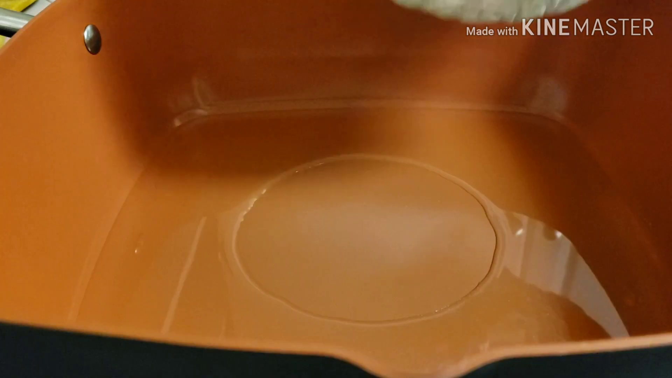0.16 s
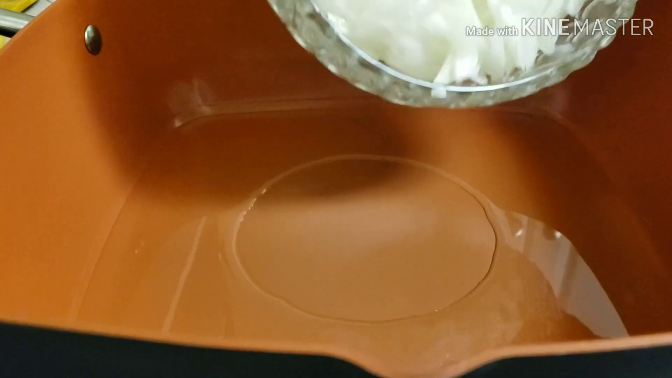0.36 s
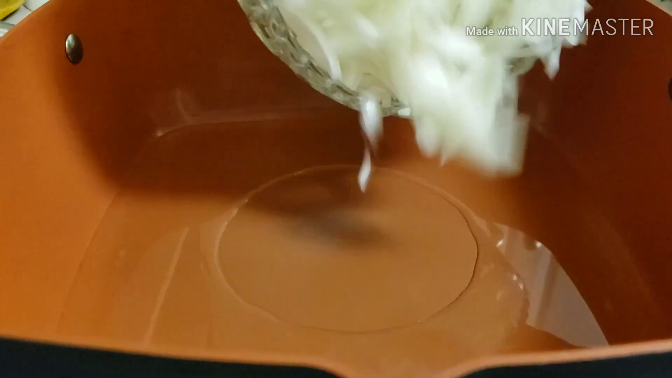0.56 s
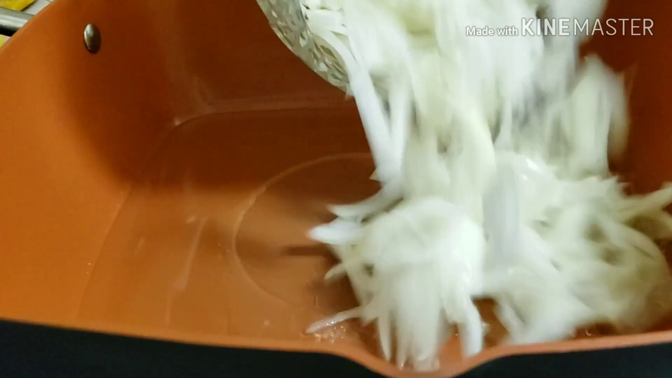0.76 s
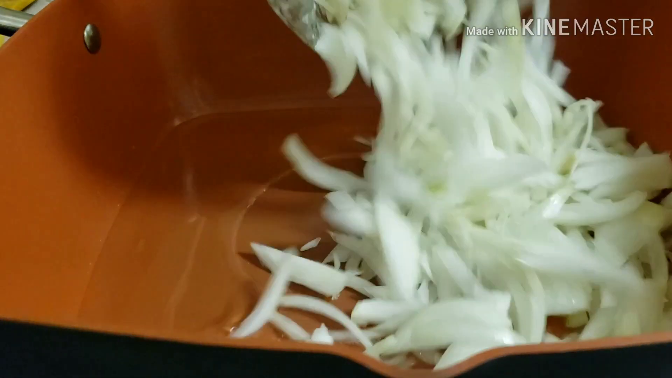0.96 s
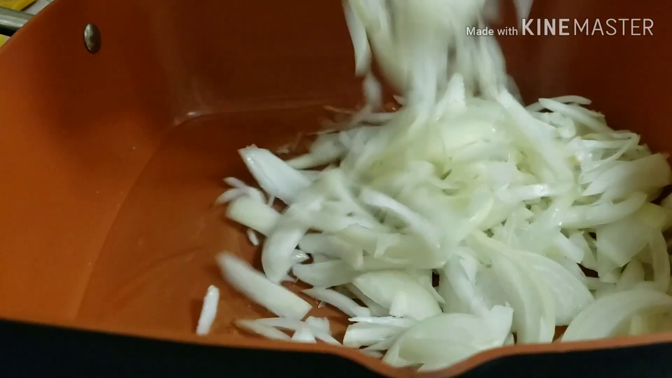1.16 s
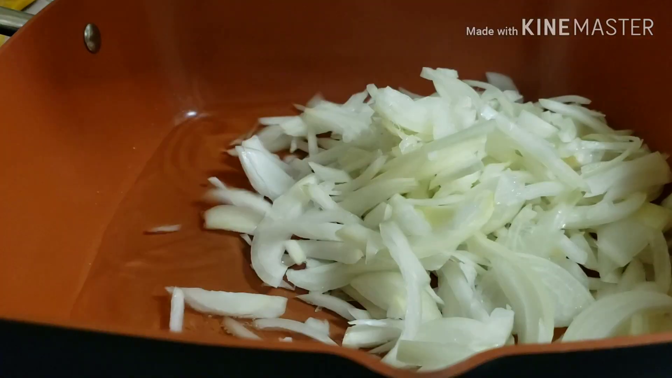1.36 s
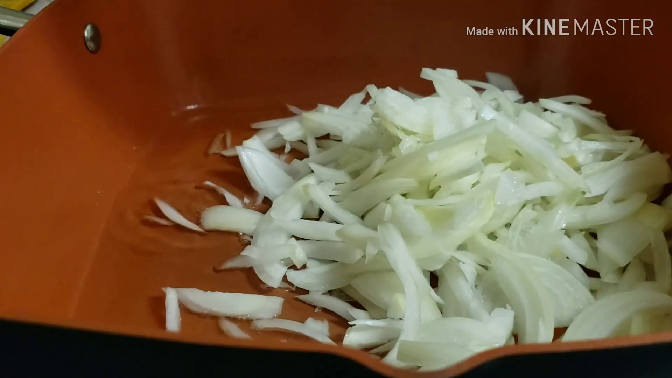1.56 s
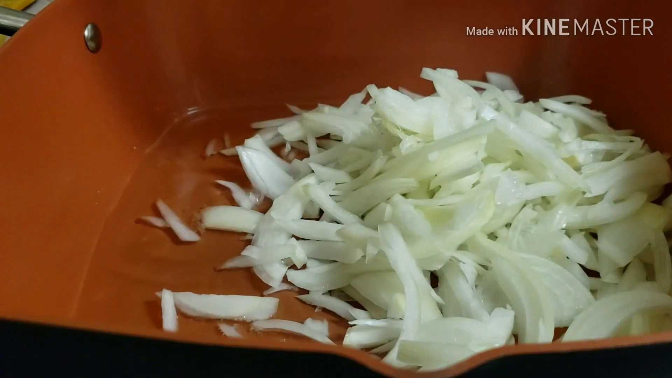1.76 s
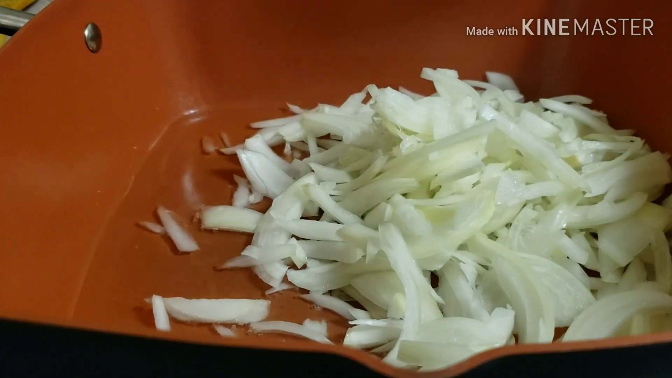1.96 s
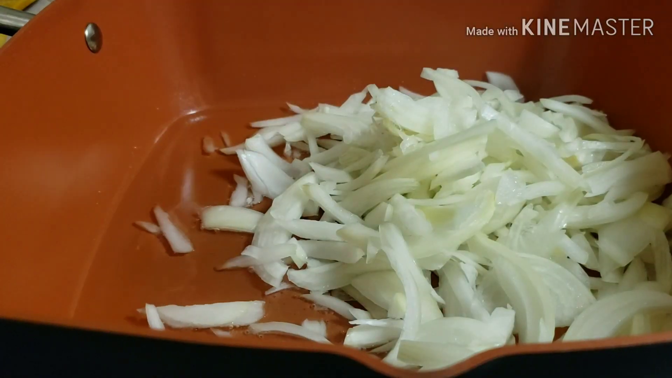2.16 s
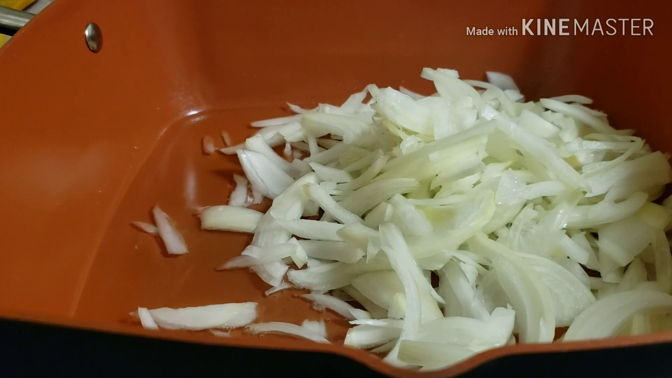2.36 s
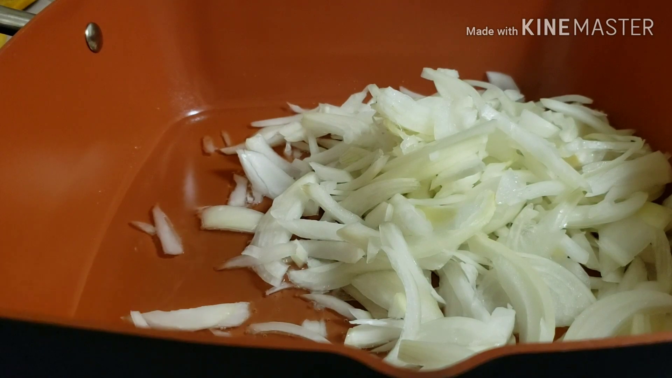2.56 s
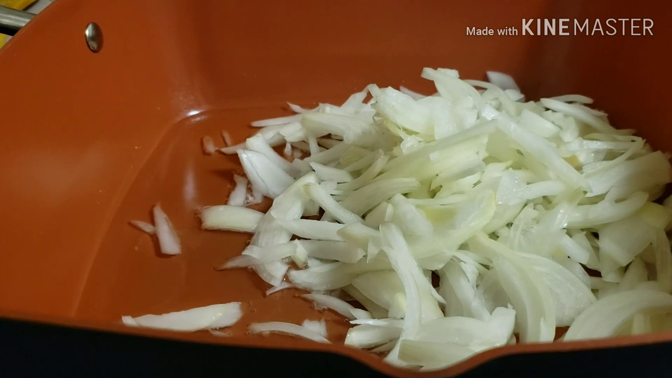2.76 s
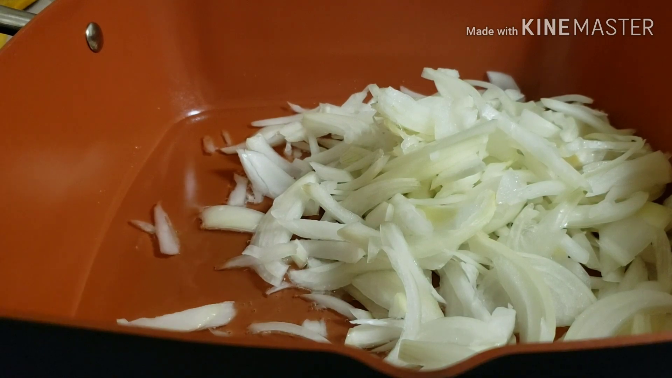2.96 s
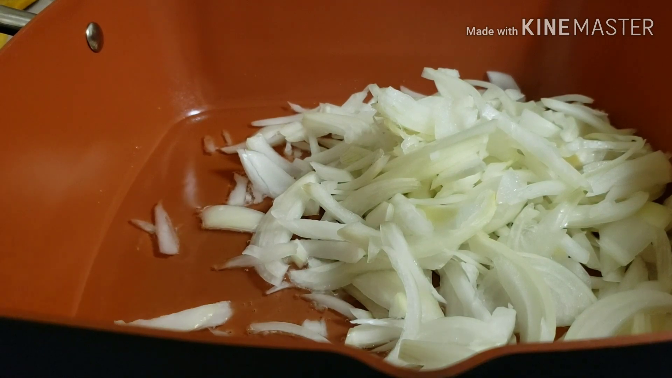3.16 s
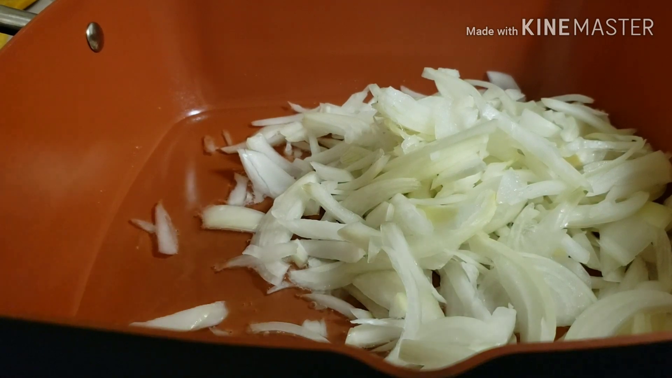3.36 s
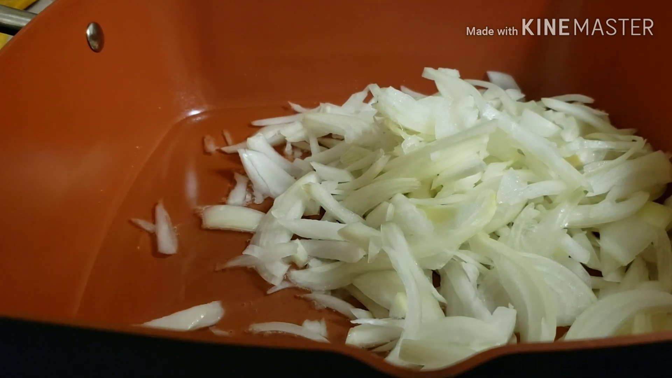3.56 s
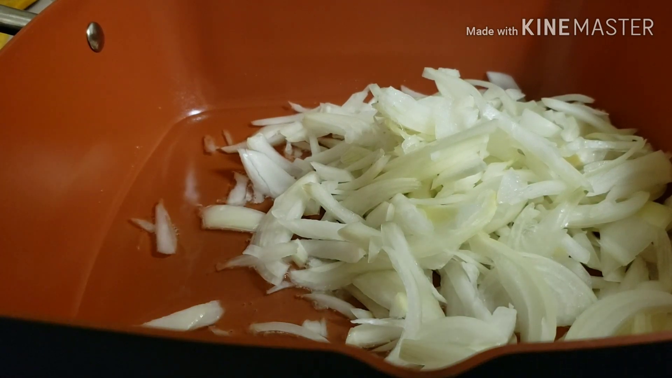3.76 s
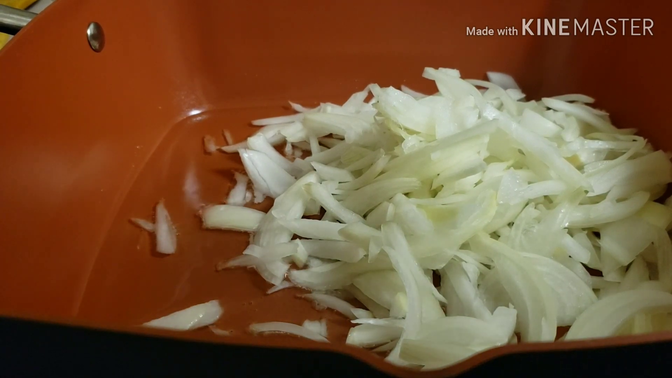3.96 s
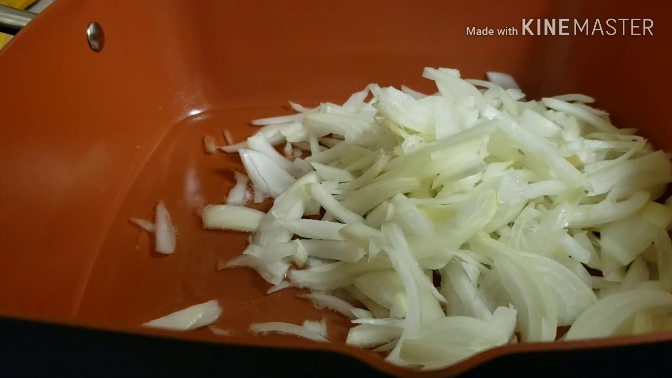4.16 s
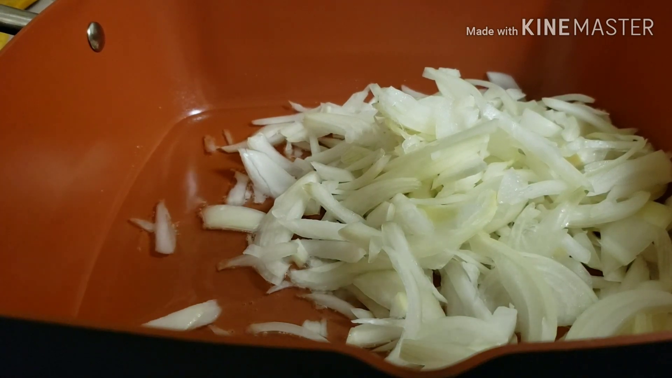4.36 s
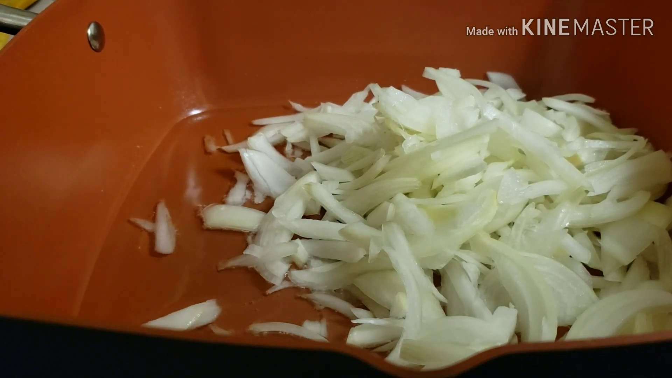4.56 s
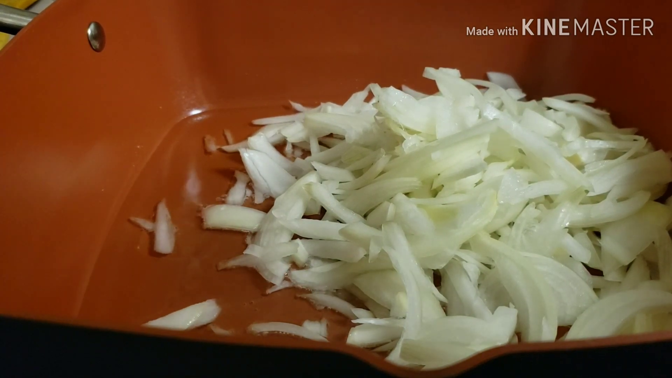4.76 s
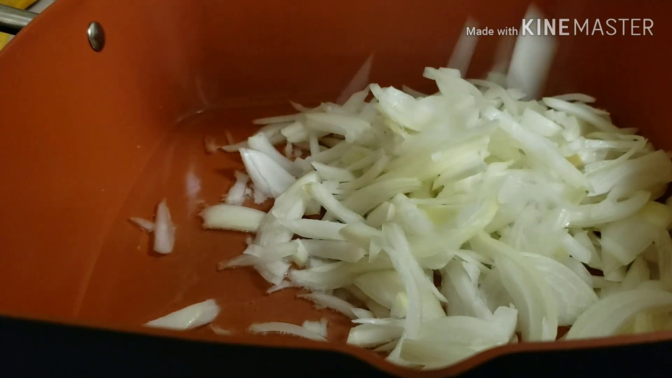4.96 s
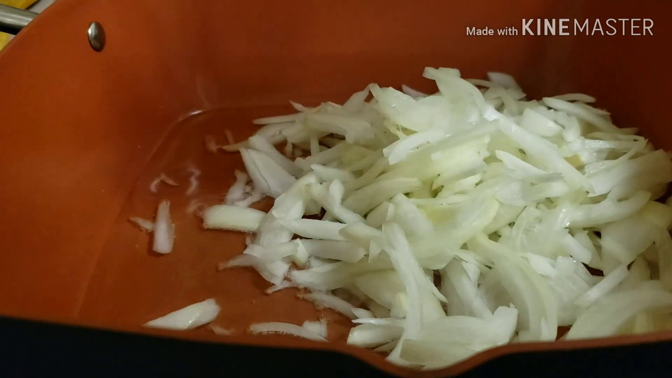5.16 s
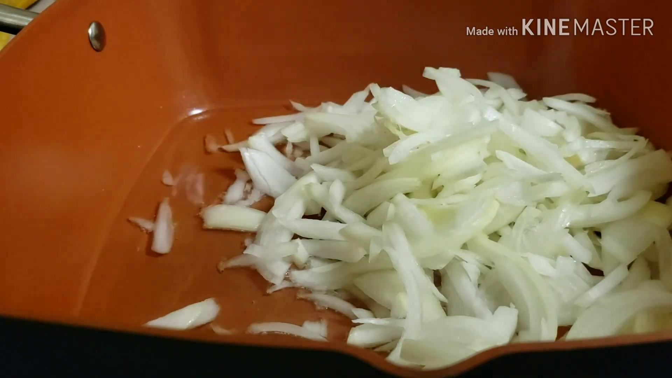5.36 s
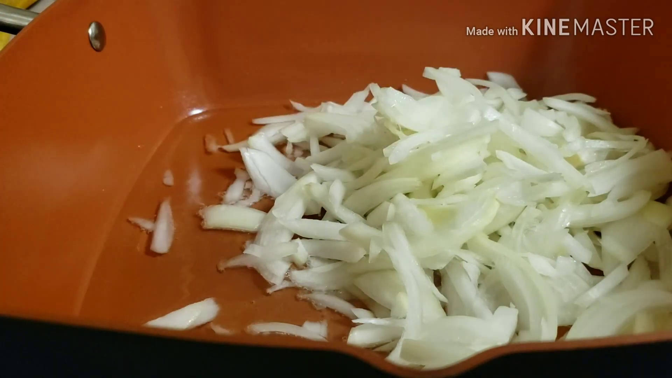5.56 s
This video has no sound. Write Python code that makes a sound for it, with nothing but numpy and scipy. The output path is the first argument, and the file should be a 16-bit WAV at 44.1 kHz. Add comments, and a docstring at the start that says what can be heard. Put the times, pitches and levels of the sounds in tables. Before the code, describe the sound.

Onion slices tumble into hot oil with a ringing clunk, then fry with an even sizzle as a glass bowl knocks on the counter.

```python
"""A kitchen, close to a pot of hot oil. A bowl of sliced onions is tipped in: the bowl clunks on the
pot, the slices thud and patter down and their water boils off as thousands of tiny bursts, with a few
louder spits. The glass bowl is then set down nearby, knocking and ringing.
A low rumble and hum lie under it all."""
import sys
import numpy as np
from scipy import signal
from scipy.fft import rfft, irfft, next_fast_len
from scipy.io import wavfile
from scipy.ndimage import uniform_filter1d

SR = 44100
rng = np.random.default_rng(int(sys.argv[2]) if len(sys.argv) > 2 else 0)


def master_out(mix):
    """Clip the mix to full scale and print it as 16-bit PCM to the path in sys.argv[1]."""
    frames = np.transpose(np.atleast_2d(mix))
    ceiling = np.clip(frames, -1, 1)
    pcm = np.round(ceiling * 32767).astype(np.int16)
    wavfile.write(sys.argv[1], SR, pcm)


N = 247842
T = np.arange(N) / SR

# Kitchen noise. Each row: frequency in Hz, relative density in dB.
ROOM_SPECTRUM = [(15, -64), (25, -57), (37, -13.5), (69, -2.5), (101, -13), (136, -10.5), (193, -19),
                 (331, -17.5), (378, -24), (457, -23), (509, -25.5), (614, -26), (1950, -46), (7700, -52),
                 (15500, -61)]
# Kitchen hum. Each row: frequency in Hz, level in dB.
HUM_LINES = [(57, -59.5), (127.5, -57.5)]
# Bowl set down. Each row: start in seconds, gain in dB, rim cut-off in Hz, delay to rocking in seconds.
SET_DOWNS = [(2.7477, 0.5, 2880, 0.037), (2.93, -3.5, 1580, .028), (2.993, 2, 5000, .019),
             (4.451, -20.5, 1200, .012)]
# Glass bowl on the counter. Each row: mode frequency in Hz, gain in dB, t60 in seconds.
BOWL_MODES = [(684, -12, .24), (813, -11, .24), (883, -7, .25), (1146, -3, .5), (1211, -10, .28),
              (1308, -13, .25), (1723, -14, .2), (1900, -5, .25), (2836, 9, .19)]
# Thud of counter and room. Each row: frequency in Hz, relative density in dB, t60 in seconds.
COUNTER_WASH = [(103, -2, 0.46), (255, -19.5, 0.37), (430, -2, 0.08), (950, -1, 0.27), (1220, 1.5, 0.26),
                (2000, -6.5, 0.16), (4030, -8.5, 0.24), (9000, -30, .08)]
# Bowl singing on as the hand lets go. Each row: start in seconds, level in dB, t60 in seconds.
BOWL_TINGS = [(2.82, -34, 0.57), (3.066, -41, 0.58), (3.563, -47, 1.0)]
# Bowl clunks on the pot, then onions thud into it.
# Each row: start in seconds, gain in dB, contact cut-off in Hz, ring gain in dB.
POT_CONTACTS = [(.6564, 0, 14000, 0), (.6602, -4, 4500, -25), (.729, -14, 500, -20), (.779, -19, 1500, -18)]
# Pot body. Each row: mode frequency in Hz, gain in dB, t60 in seconds.
POT_MODES = [(112, -12, .5), (150, -8, .45), (197, -9, .45), (255, -8, .4), (453, -8, .48), (520, -7, .45),
             (602, -6, .42), (673, -6.5, .44), (857, -1.5, .3), (998, 5, .32), (1130, -17, .35),
             (1427, -14, .35), (1680, -6, .28), (1825, -9, .28), (2050, -6, .26), (2209, 1.5, .19),
             (2305, -3, .2), (2402, 4, .21), (2891, -14, .3), (3165, -13, .28), (3340, -6, .18),
             (3790, -8, .34), (4371, -16, .3)]
# Dense ring of pot, hob and room. Each row: frequency in Hz, relative density in dB, t60 in seconds.
POT_WASH = [(60, -5, 0.96), (130, -3.5, 0.44), (350, -13, 0.66), (655, 5, 0.16), (1380, -1.5, 0.32),
            (2390, -5, 0.36), (4040, -3, 0.26), (7500, 2.5, 0.035), (11000, -10, 0.19), (15500, -30, .07)]
# Clumps of slices. Each row: landing time in seconds, level in dB.
ONION_CLUMPS = [(.72, -35), (.98, -53), (1.142, -54.5)]
# Oil spits. Each row: start in seconds, gain in dB, pitch in Hz, t60 in seconds.
OIL_SPITS = [(2.172, -19, 6000, 0.025), (3.291, -18, 4570, .02), (4.4135, -19, 7900, 0.04),
             (4.5754, -15, 12900, .006), (4.7284, -17, 4470, 0.016), (4.8527, -19, 7460, 0.033),
             (5.428, -13, 4420, 0.028), (5.5832, -13.5, 3970, 0.07)]
# Air resonances of the pot. Each row: frequency in Hz, width in Hz, lift in dB.
POT_AIR_MODES = [(1594, 150, 4.5), (2065, 72, 4.5), (2680, 140, 2), (4340, 150, 1), (5550, 110, 0),
                 (7000, 140, 1.5), (7900, 220, 2.5), (13000, 400, 0.5)]
# Sizzle leaving the pot. Each row: frequency in Hz, relative density in dB.
SIZZLE_SPECTRUM = [(300, -30), (500, -18), (850, -12.5), (1100, -16), (1380, -14.5), (1560, -6.5),
                   (2400, -4.5), (3300, -1), (4500, -0.3), (5900, -2.5), (7700, -0.5), (8700, -4.5),
                   (12000, 0.5), (15500, -3.5)]
# Stereo width of the sizzle. Each row: frequency in Hz, side minus mid in dB.
SIZZLE_WIDTH = [(400, 7), (850, -9), (1150, 3), (1600, -7), (2400, -3), (4500, -1), (5700, 2.5),
                (7000, -0.5), (9000, 0), (12500, -1), (15000, 0.5)]
# Balance of the sizzle. Each row: frequency in Hz, left minus right in dB.
SIZZLE_BALANCE = [(500, 3), (1600, 1.5), (3500, 1), (6000, 1), (9300, 3), (11200, 4), (12200, 2),
                  (15000, 4.5)]
# How hard the water boils off. Each row: time in seconds, sizzle gain in dB.
BOIL_CURVE = [(0.76, -42.5), (0.8, -44), (0.86, -35.5), (0.93, -40), (0.95, -38.5), (1.17, -35.5),
              (2.88, -41), (2.95, -39.5), (3.42, -40.5), (4.25, -38), (5.34, -39.5), (5.35, -40)]


def undb(db):
    """Decibels to gain."""
    return 10 ** (np.asarray(db) / 20)


def unit(x):
    """Scale to rms 1."""
    return x / np.sqrt(np.mean(x ** 2))


def colour(x, points):
    """Filter by a spectrum of (Hz, dB) points."""
    size = next_fast_len(x.shape[-1])
    hz, db = np.transpose(points)[:2]
    bins_hz = np.maximum(np.arange(size // 2 + 1) * SR / size, 1)
    gain = undb(np.interp(np.log(bins_hz), np.log(hz), db))
    return irfft(rfft(x, size) * gain, size)[..., :x.shape[-1]]


def cut(x, hz, kind):
    """Butterworth filter."""
    return signal.sosfilt(signal.butter(2, hz, kind, fs=SR, output="sos"), x)


def fade(t, t60_s):
    """Exponential decay."""
    return np.exp(-np.log(1000) * t / t60_s)


def pan(db):
    """Stereo gains, left db above right."""
    return undb(np.array([[db], [-db]]) / 2)


def walk(rate_hz):
    """Slow random wander, rms 1."""
    hold = int(SR / rate_hz)
    steps = np.repeat(rng.standard_normal(N // hold + 1), hold)
    return unit(uniform_filter1d(uniform_filter1d(steps, hold), hold)[:N])


def add(out, start_s, sound):
    """Mix in a stereo sound."""
    i = int(start_s * SR)
    out[:, i:i + sound.shape[1]] += sound[:, :N - i]


def kitchen(room_db=-51.5, rise_db_per_s=0.9749):
    """Low rumble and faint hiss, slowly growing, with a wavering hum."""
    mid, side = colour(rng.standard_normal((2, N)), ROOM_SPECTRUM)
    side = colour(side, [(60, -19.5), (130, -12.0), (300, -10.5), (1000, 0.5)])
    air = unit(np.array([mid + side, mid - side]))
    bass = colour(air, [(120, 0), (400, -30)])
    rumble = (air + 0.037 * walk(14) * bass) * undb(room_db + rise_db_per_s * T)
    hum = 0
    for hz, db in HUM_LINES:
        phase = 2 * np.pi * np.cumsum(hz + 3 * walk(14)) / SR
        hum += undb(db) * np.sqrt(2) * np.sin(phase) * (1 + .4 * walk(12))
    return (rumble + hum) * pan(0.99)


def wash(table, t):
    """Countless overlapping modes: half-octave noise bands, each with its own decay."""
    hz, _, t60_s = np.transpose(table)
    spectrum = rfft(unit(colour(rng.standard_normal((2, len(t))), table)))
    bins_hz = np.arange(len(t) // 2 + 1) * SR / len(t)
    coherence = 1 / (1 + (bins_hz / 400) ** 2)  # long waves reach both sides alike
    spectrum[1] = coherence * spectrum[0] + np.sqrt(1 - coherence ** 2) * spectrum[1]
    out = 0
    for low_hz in 40 * 2 ** (np.arange(18) / 2):
        in_band = (bins_hz >= low_hz) & (bins_hz < low_hz * np.sqrt(2))
        band_t60_s = np.interp(np.log(low_hz * 2 ** (1 / 4)), np.log(hz), t60_s)
        out += irfft(spectrum * in_band, len(t)) * fade(t, band_t60_s)
    return out


def blows(contacts, modes, wash_table, modes_db, swell_s, wash_db, crack_db, crack_t60_s):
    """Each contact cracks and sets the body ringing; softer contacts are duller."""
    out, t = np.zeros((2, N)), T[:24576]
    for start_s, db, cutoff_hz, ring_db in contacts:
        ring = 0
        for (hz, mode_db, t60_s), phase in zip(modes, 2 * np.pi * rng.random(len(modes))):
            lag_rad = np.array([[0], [min(hz / 650, 1.6)]])
            ring += undb(mode_db) * np.sin(2 * np.pi * hz * t + phase - lag_rad) * fade(t, t60_s)
        ring *= 1 - np.exp(-t / swell_s)  # the blow spreads through the body
        crack = cut(rng.standard_normal((2, len(t))) * fade(t, crack_t60_s), 8500, "low")
        dense = wash(wash_table, t)
        blow = undb(modes_db + ring_db) * ring + undb(wash_db) * dense + undb(crack_db) * crack
        add(out, start_s, undb(db) * cut(blow, cutoff_hz, "low"))
    return out


def glass_bowl(damped_db=-25, free_db=3, ting_hz=1146):
    """The bowl meets the counter in four contacts; once let go, its longest mode sings on."""
    contacts = []
    for start_s, db, rim_hz, rock_s in SET_DOWNS:
        contacts += [(start_s, db, 1520, damped_db),  # base, damped by the hand
                     (start_s + .004, db - 6.5, rim_hz, free_db),  # rim
                     (start_s + rock_s, db - 10, 2100, damped_db),  # rocks back
                     (start_s + .072, db - 12, 1500, damped_db)]  # comes to rest
    out = blows(contacts, BOWL_MODES, COUNTER_WASH, modes_db=-25, swell_s=0.0059,
                wash_db=-26, crack_db=-44, crack_t60_s=0.0091) * pan(1.9)
    t = T[:SR]
    ting = np.sin(2 * np.pi * ting_hz * t + np.array([[0], [2]]))
    for start_s, db, t60_s in BOWL_TINGS:
        add(out, start_s, undb(db) * ting * fade(t, t60_s))
    return out


def pot_knocks():
    """The bowl clunks on the pot and sets it ringing, then onions thud into it."""
    return blows(POT_CONTACTS, POT_MODES, POT_WASH, modes_db=-25.5, swell_s=0.00049,
                 wash_db=-17.0, crack_db=-6.5, crack_t60_s=0.017) * pan(0.92)


def grains(low_hz, high_hz, decay_cycles, spread_db, smear_s, count, samples):
    """Bursts at random times and places, four damped rings each; most small, a few large."""
    when, place, rarity = np.repeat(rng.random((count, 3)), 4, axis=0).T
    pitch, lag, late = rng.random((4 * count, 3)).T
    strength = undb(spread_db * np.minimum(-np.log(1 - rarity), 6))
    hz = (low_hz + (high_hz - low_hz) * pitch)[:, None]
    cycles = (hz * np.arange(samples) / SR).astype(np.float32)
    rings = np.sin(2 * np.pi * cycles) * np.exp(-cycles / decay_cycles) * np.sqrt(hz) * strength[:, None]
    out = []
    for side in (1, -1):
        # each ring takes its own path off the pot walls to either side
        start = (when * N + late * smear_s * SR + side * (lag - .5) * samples).astype(int) % N
        index = start[:, None] + np.arange(samples)
        panned = rings * (1 + side * (place[:, None] - .5))
        out.append(np.bincount(index.ravel(), panned.ravel(), N)[:N])
    return np.array(out)


def onion_patter(spill_s=0.061, settle_t60_s=0.71):
    """Wet slices slap on the pot floor and each other; each clump spills in, then settles."""
    slaps = grains(120, 1000, decay_cycles=3, spread_db=2, smear_s=.02, count=600, samples=1024)
    envelope = 0
    for land_s, db in ONION_CLUMPS:
        spill = np.clip(1 + (T - land_s) / spill_s, 0, 1)
        envelope += undb(db) * spill * fade(np.maximum(T - land_s, 0), settle_t60_s)
    return unit(cut(slaps, 1300, "low")) * envelope


def oil_spits(ring_db=-11.5, snap_db=-7.0):
    """Larger drops burst with a snap and a brief pitched ring."""
    out, t = np.zeros((2, N)), T[:SR // 10]
    for start_s, db, hz, t60_s in OIL_SPITS:
        edges_hz = hz * 2 ** (np.array([-1, 1]) / 7)
        ring = unit(cut(rng.standard_normal((2, len(t))), edges_hz, "band")) * fade(t, t60_s)
        snap = unit(cut(rng.standard_normal((2, len(t))), 1900, "high")) * fade(t, 0.0019)
        add(out, start_s, (ring * undb(ring_db) + snap * undb(snap_db)) * undb(db) * pan(4.3))
    return out


def pot_air(x):
    """The air in the pot lifts its resonances."""
    for hz, width_hz, db in POT_AIR_MODES:
        x = x + (undb(db) - 1) * signal.lfilter(*signal.iirpeak(hz, hz / width_hz, fs=SR), x)
    return x


def sizzle(start_s=.66, wetting_s=.025, heating_s=1, fizz_db=-0.35, hot_db=-0.62, cold_offset_db=-3):
    """Steam bursts through the oil: fine fizz, and coarse bubbles that catch up as the slices heat."""
    bursts = grains(300, 17000, decay_cycles=1.6, spread_db=1.7, smear_s=.002, count=16000, samples=48)
    hiss = undb(-2) * rng.standard_normal((2, N))  # bursts merging under the heap
    left, right = pot_air(unit(bursts) + hiss)
    mid = colour(left + right, SIZZLE_SPECTRUM)
    side = colour(colour(left - right, SIZZLE_SPECTRUM), SIZZLE_WIDTH)
    balance = np.array(SIZZLE_BALANCE)
    steam = np.array([colour(mid + sign * side, balance * [1, sign / 2]) for sign in (1, -1)])
    bubbles = colour(steam, [(7500, 0), (8500, -6), (10000, -40)])
    fizz = steam - bubbles
    bubbles /= np.std(bubbles.mean(0))
    fizz /= np.std(fizz.mean(0))
    in_oil_s = np.maximum(T - start_s, 0)
    wetting = np.minimum(in_oil_s / wetting_s, 1)
    bubbles_db = hot_db + cold_offset_db * np.exp(-in_oil_s / heating_s)
    boil_db = np.interp(T, *np.transpose(BOIL_CURVE))
    return (bubbles * undb(bubbles_db) + fizz * undb(fizz_db)) * undb(boil_db) * wetting


def scene():
    """Knocks, frying and kitchen background, in stereo."""
    return pot_knocks() + glass_bowl() + sizzle() + oil_spits() + onion_patter() + kitchen()


def record(dry, top_hz=15480):
    """The phone rounds the loudest peak and cuts the top."""
    return signal.sosfilt(signal.ellip(10, .2, 80, top_hz, fs=SR, output="sos"), np.tanh(dry))


dry = scene()
out = record(dry)
master_out(out)
```